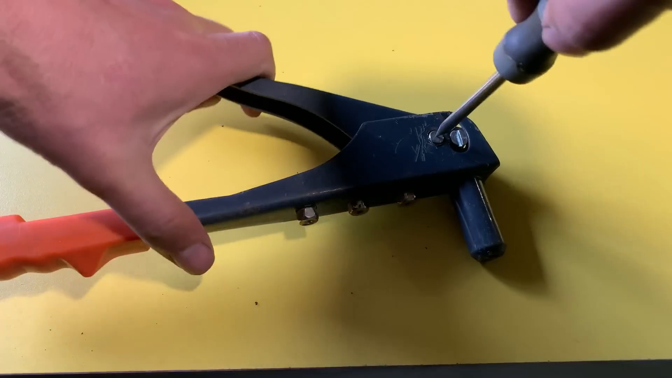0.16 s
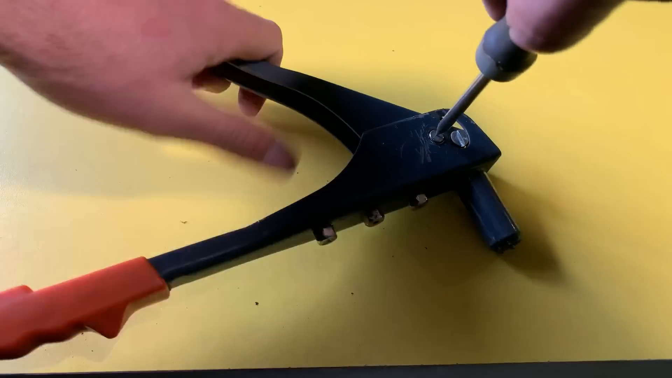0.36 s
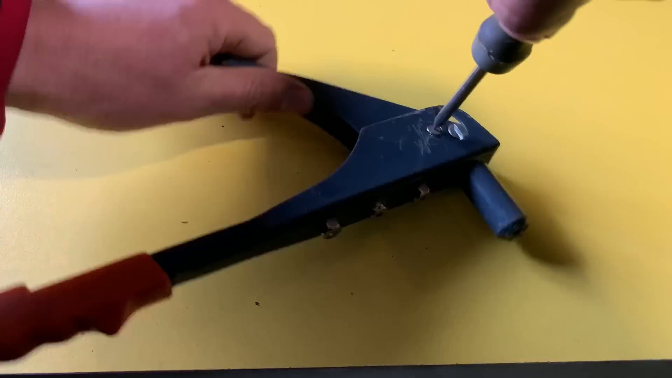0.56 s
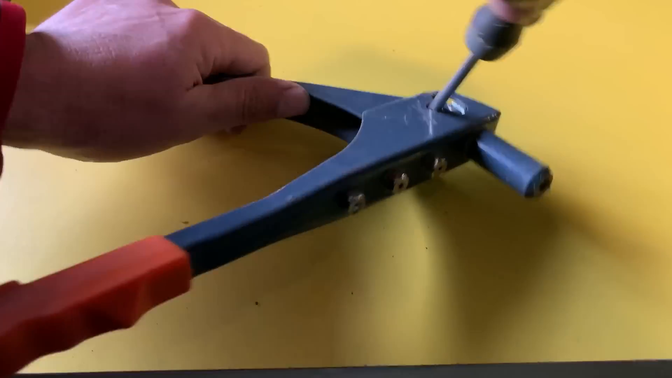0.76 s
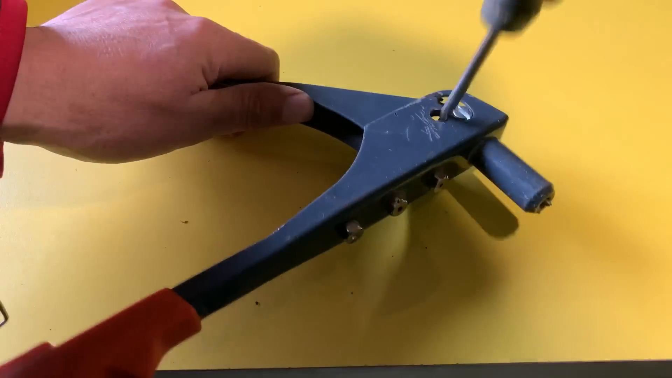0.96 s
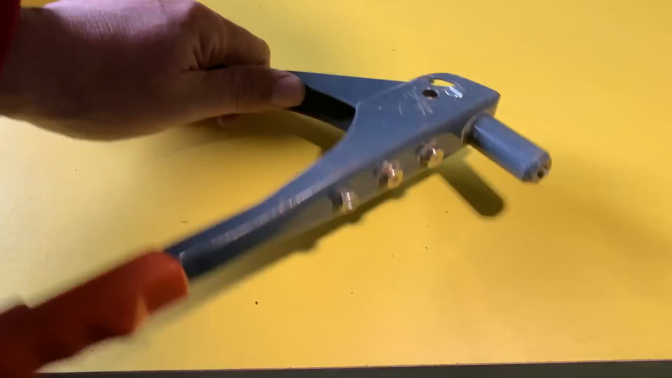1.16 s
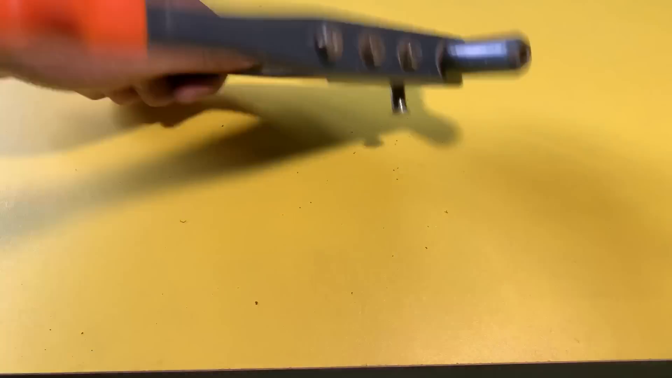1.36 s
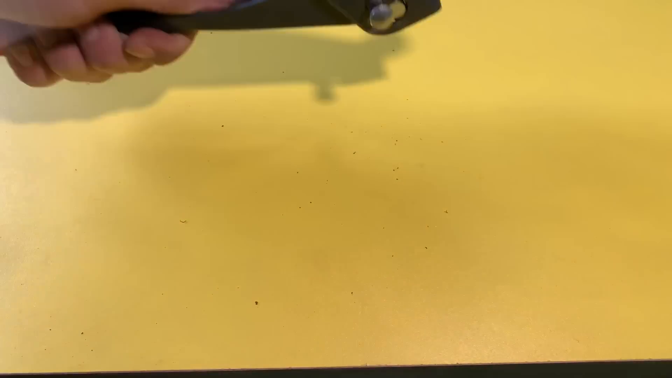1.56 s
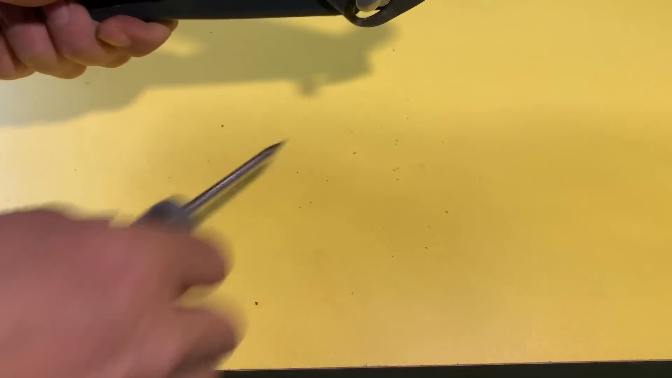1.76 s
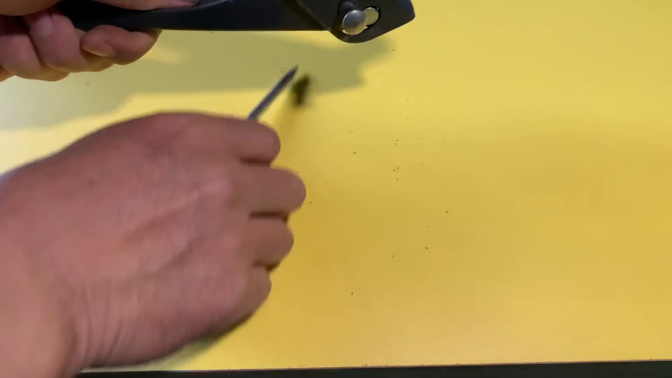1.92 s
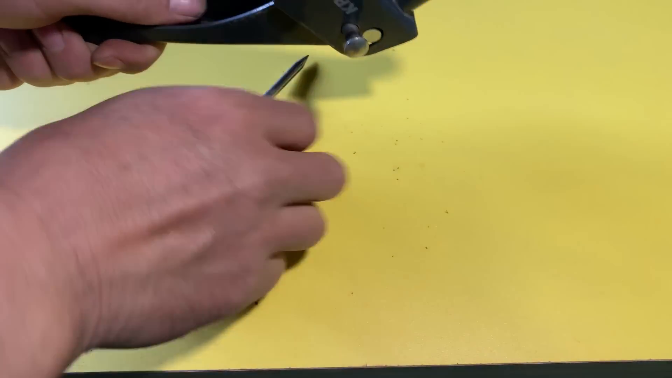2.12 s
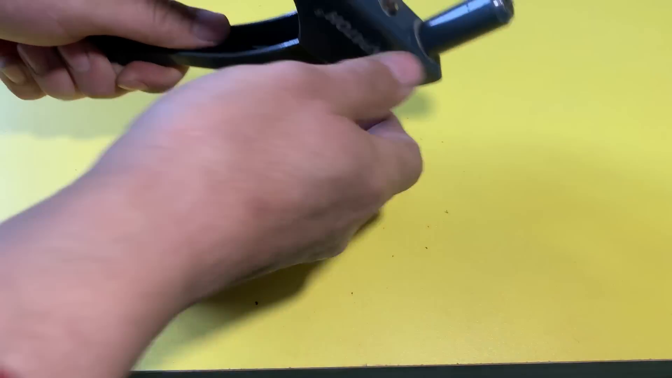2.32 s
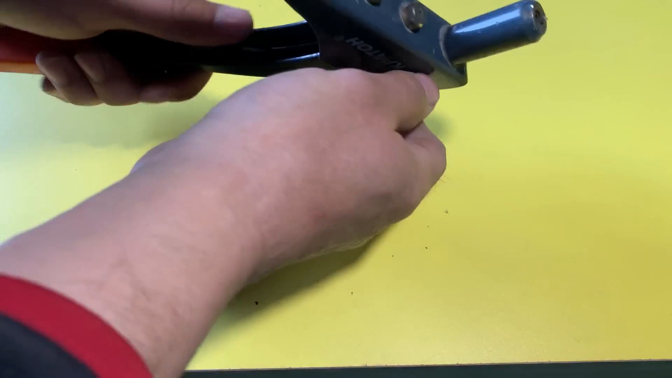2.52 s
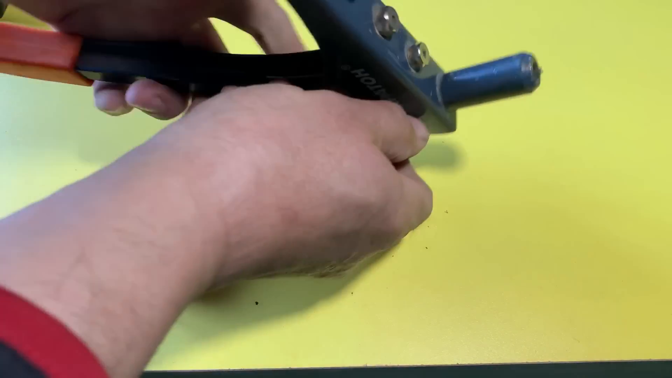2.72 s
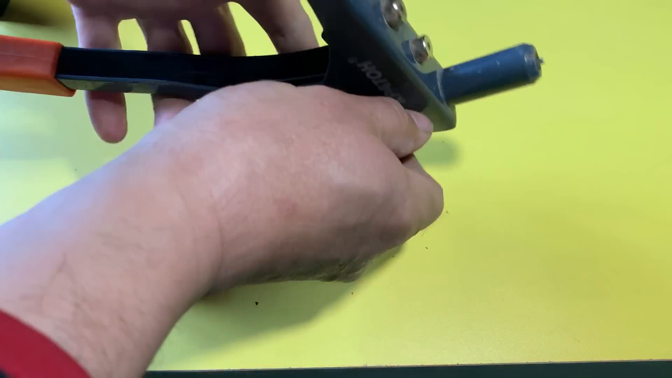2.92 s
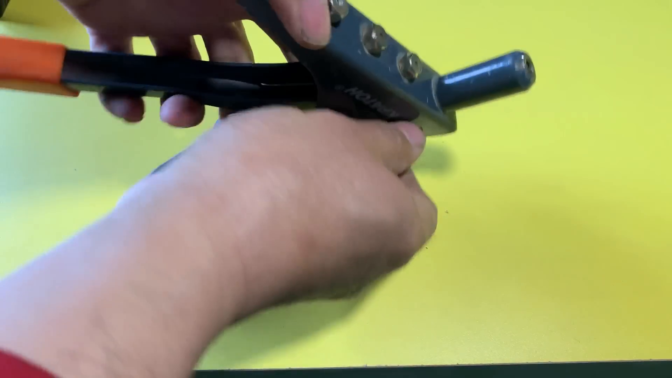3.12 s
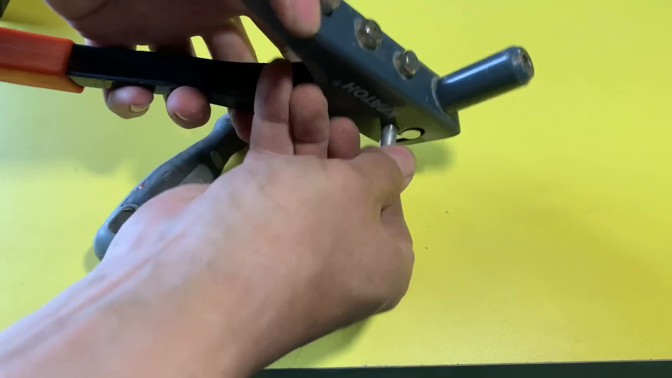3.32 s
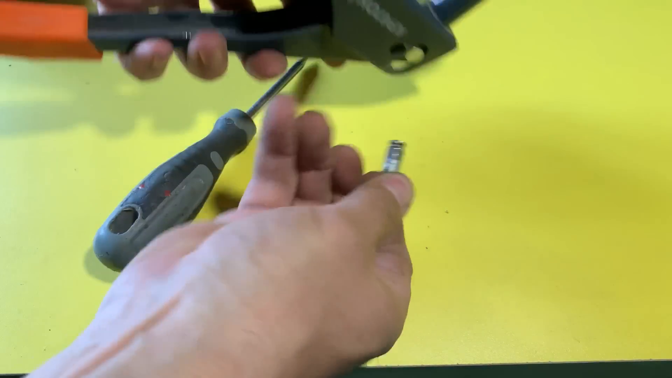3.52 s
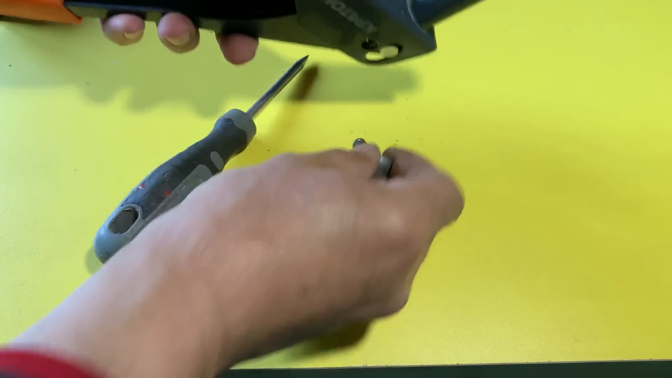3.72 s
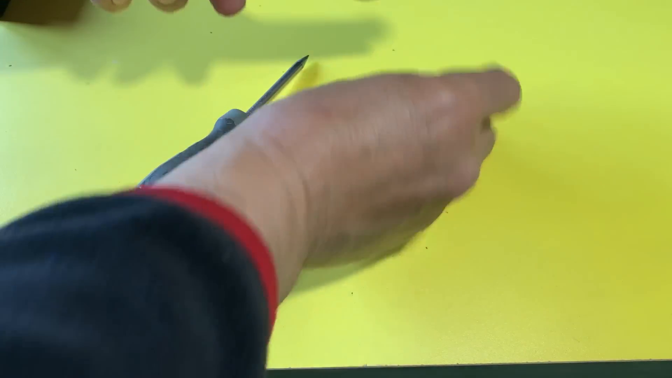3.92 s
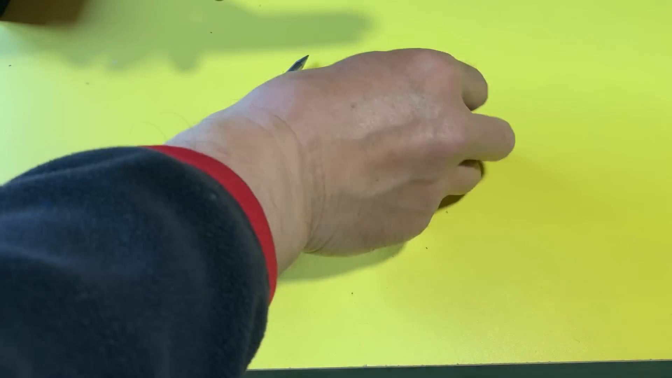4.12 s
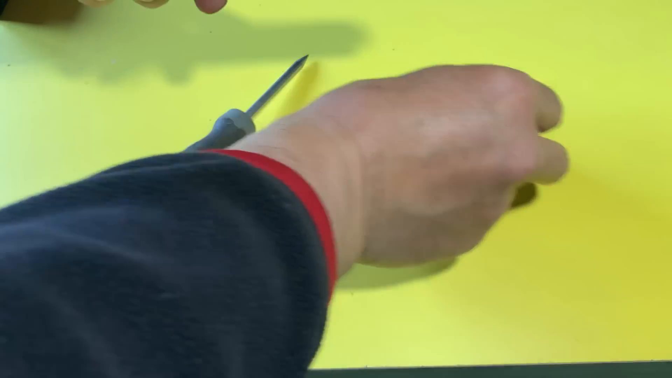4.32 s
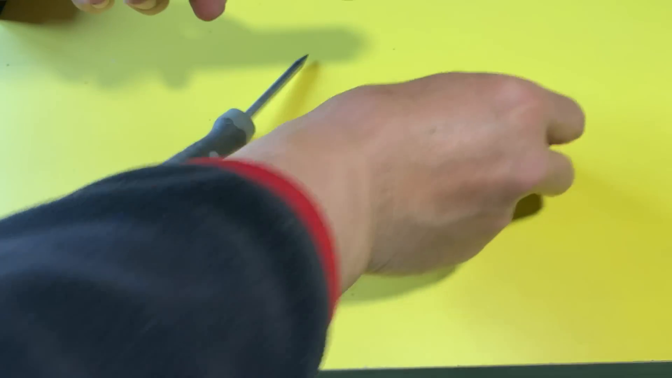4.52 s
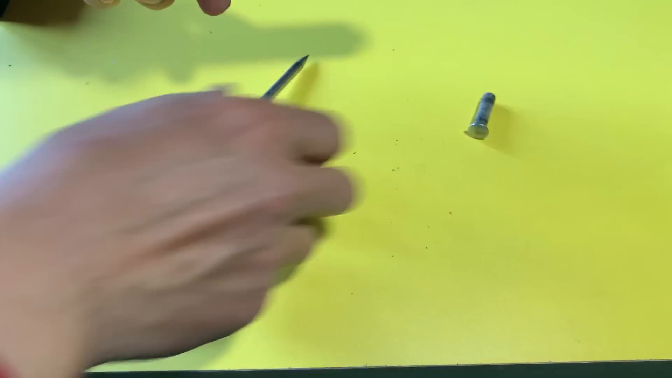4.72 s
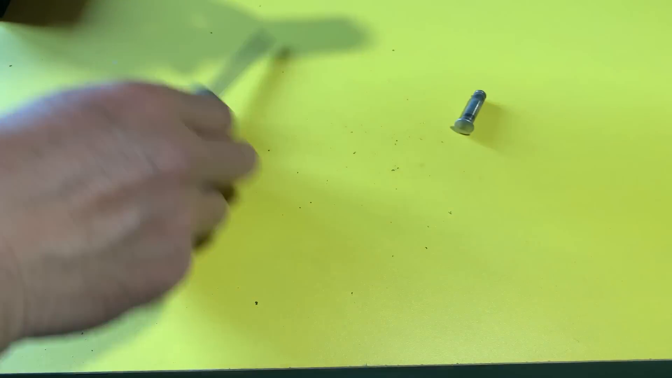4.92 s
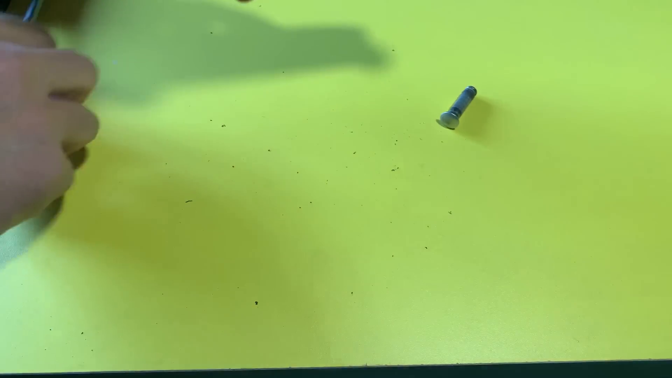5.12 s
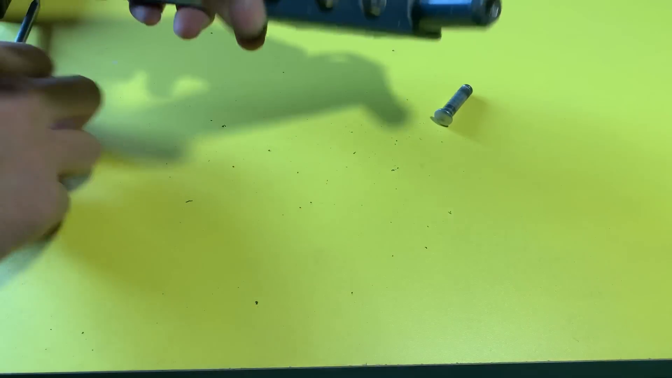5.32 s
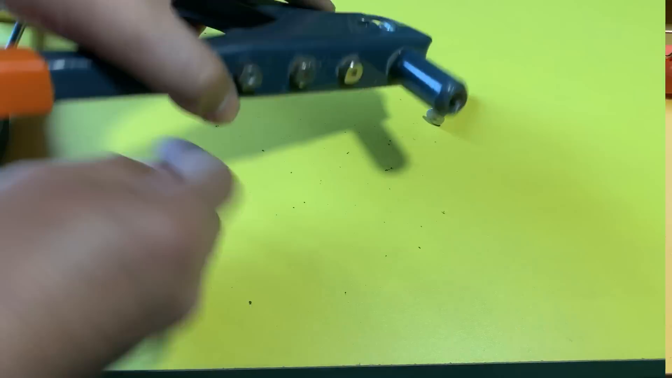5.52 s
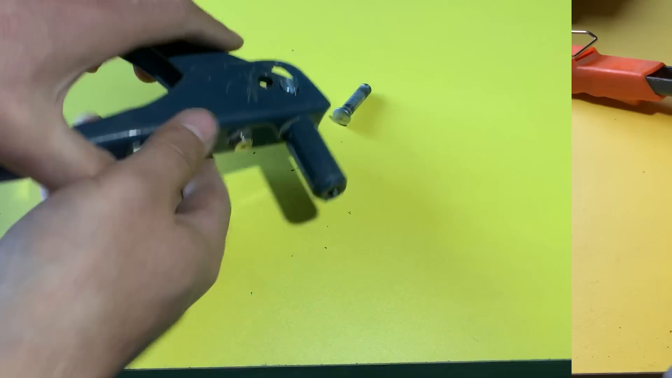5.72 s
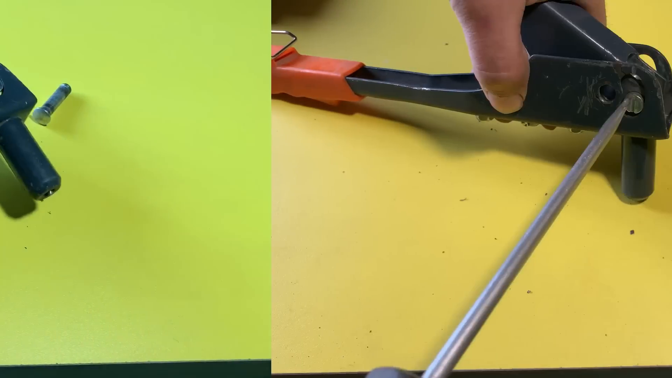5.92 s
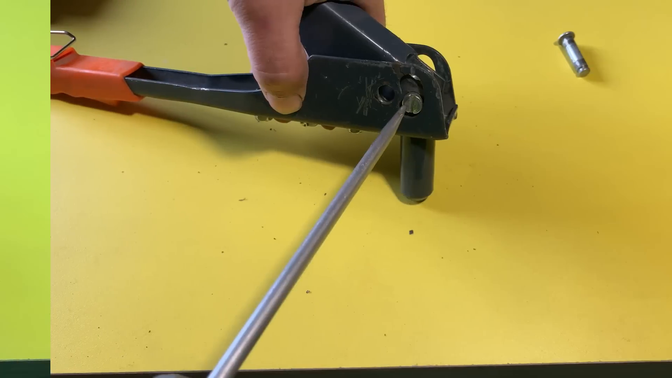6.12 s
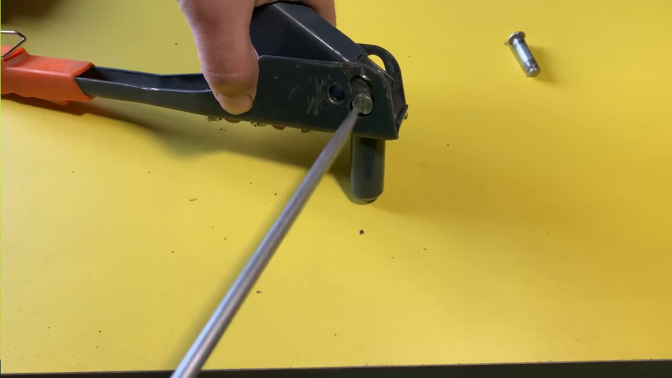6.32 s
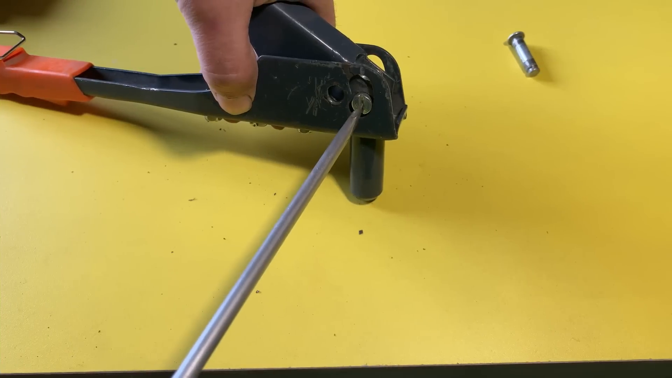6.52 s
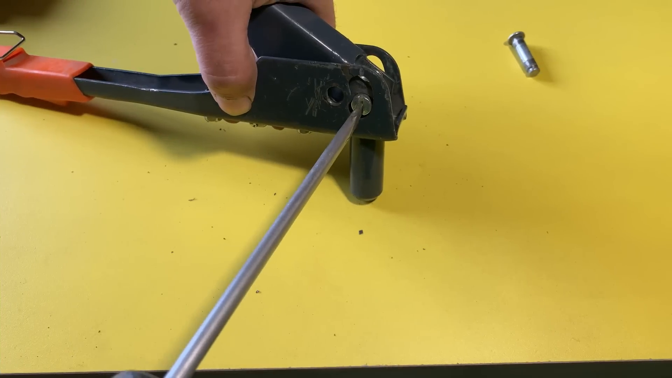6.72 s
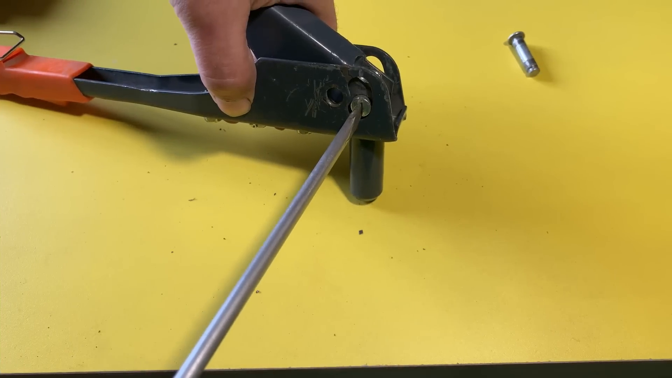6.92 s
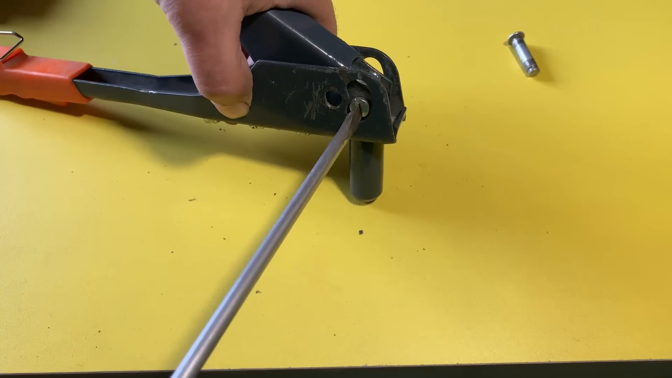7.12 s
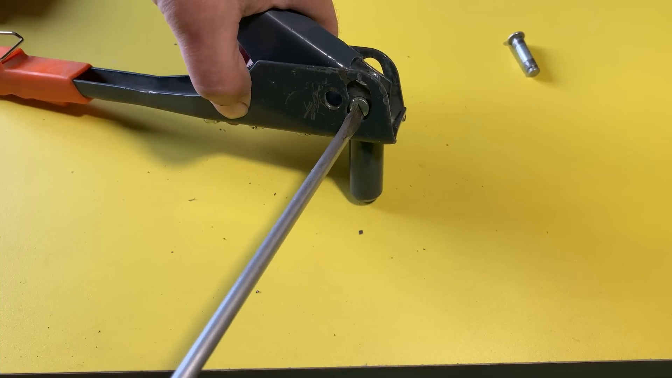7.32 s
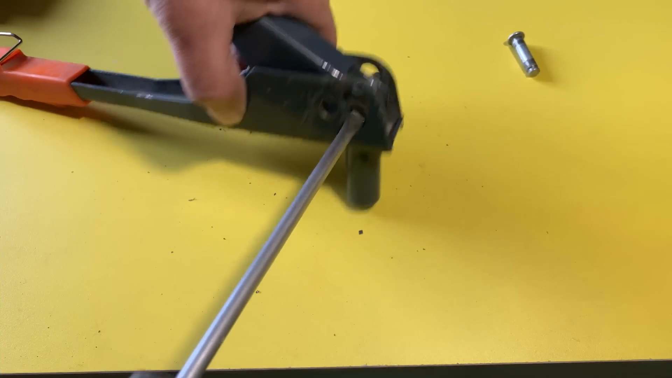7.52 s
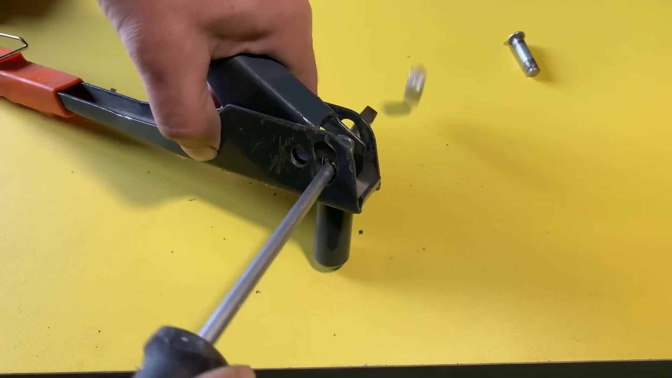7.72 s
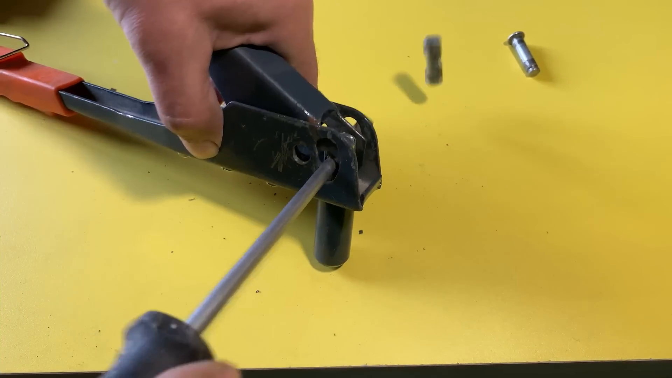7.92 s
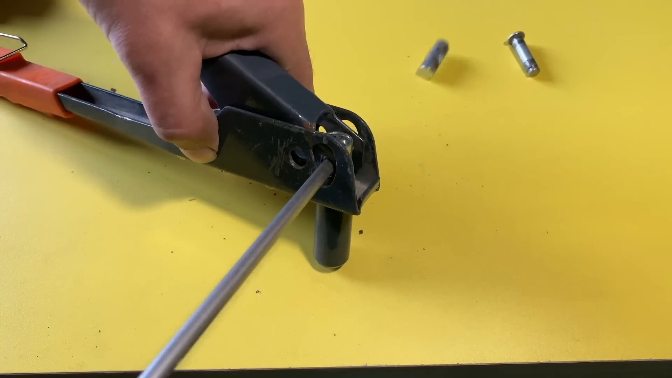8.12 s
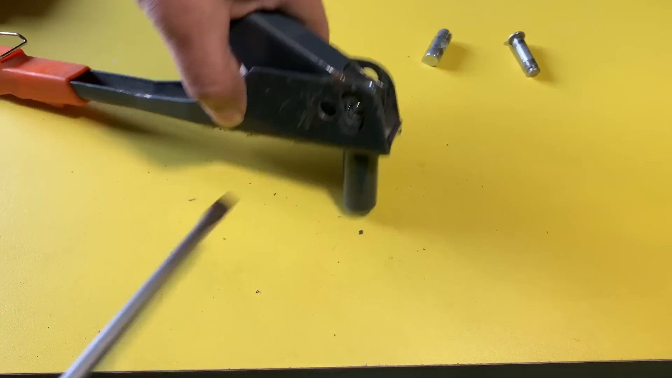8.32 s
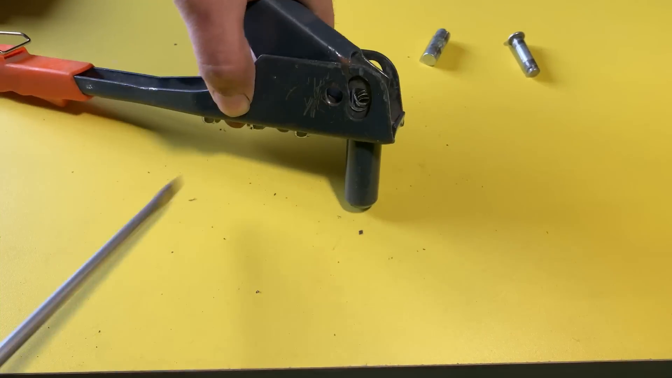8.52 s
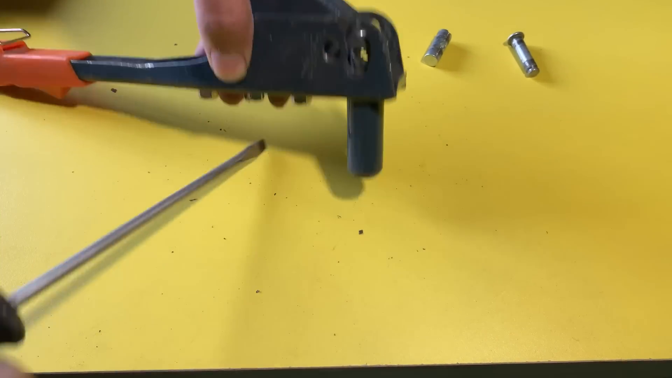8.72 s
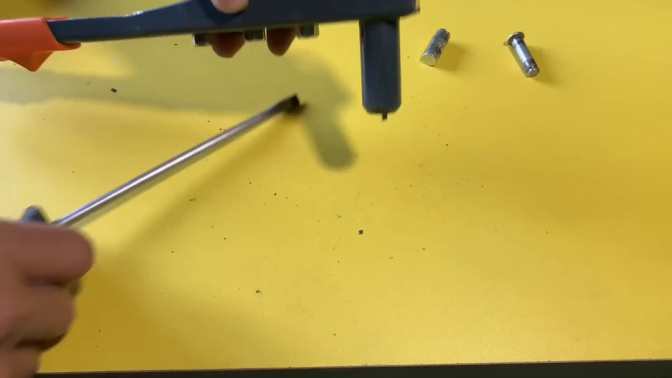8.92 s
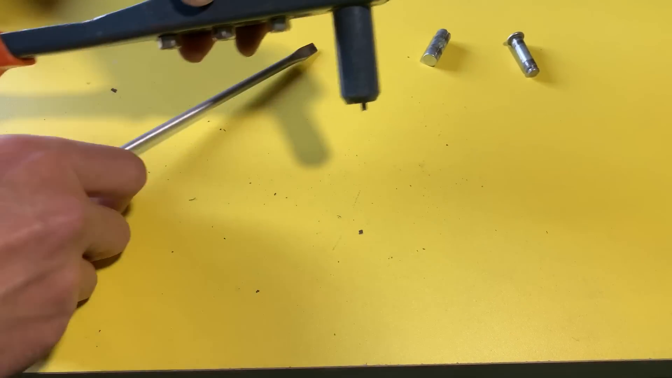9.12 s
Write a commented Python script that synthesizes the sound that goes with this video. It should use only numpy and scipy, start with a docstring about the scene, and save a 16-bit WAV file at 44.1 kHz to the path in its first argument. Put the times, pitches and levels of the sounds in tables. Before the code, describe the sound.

Close, dry steel sounds in a bare, ringing workshop. A loud clank and table thump come first, then a knock, faint clinks and soft rubbing. A pin scrapes out with a thin squeal and is set down; a hollow grip clatters. After quiet ticking, a second pin rattles out and bounces on the table, and a screwdriver drops and drags.

```python
"""Riveter on a workshop table

A hand riveter is taken apart in a bare, ringing workshop: the steel sounds close and dry, the table fills the room.
A screwdriver pushes out two steel pins; frame and lever clink and knock, the second pin drops and bounces,
and the screwdriver is laid down. Hard parts are decaying modes and noise cracks, struck once, in chatter or by
friction; the table is bending waves and booming modes; soft rubbing and air are coloured noise."""
import sys
import numpy as np
from scipy import signal
from scipy.fft import rfft, irfft, next_fast_len
from scipy.io import wavfile

SR = 44100
rng = np.random.default_rng(int(sys.argv[2]) if len(sys.argv) > 2 else 0)


def digitize_waveform(pressure):
    """Quantize a signal to 16-bit integers and store it at the path in sys.argv[1].

    Rows of a 2-D input are taken as channels; values are limited to [-1, 1].
    """
    field = np.atleast_2d(pressure).T
    bounded = np.clip(field, -1, 1)
    quanta = np.round(bounded * 32767).astype(np.int16)
    wavfile.write(sys.argv[1], SR, quanta)


N = 408366
HIT_T = np.arange(SR // 6) / SR  # time axis of a single touch, s


def from_db(db):
    """Amplitude ratio of a level in dB."""
    return 10 ** (np.asarray(db) / 20)


def unit_energy(x):
    """Sum of squares 1 in each channel."""
    return x / np.sqrt(np.sum(x ** 2, axis=-1, keepdims=True) + 1e-20)


def at_hz(points, hz):
    """Read a table on a log-frequency axis."""
    known_hz, values = np.transpose(points)
    return np.interp(np.log(np.maximum(hz, 1)), np.log(known_hz), values)


def dying(t, t60):
    """Exponential decay that falls 60 dB in t60 seconds."""
    return np.exp(-np.log(1000) * t / np.maximum(t60, 1e-5))


def add(track, s, sound):
    """Mix a sound in at time s."""
    start = max(round(s * SR), 0)
    track[:, start:start + sound.shape[-1]] += sound[..., :N - start]


def cut(x, hz, kind, order=2):
    """Low- or high-pass."""
    sos = signal.butter(order, min(hz, SR / 2 - 1), kind, fs=SR, output="sos")
    return signal.sosfilt(sos, x)


def through(x, response):
    """Pass a sound through an impulse response."""
    convolved = signal.fftconvolve(np.atleast_2d(x), np.atleast_2d(response), axes=-1)
    return convolved[:, :x.shape[-1]]


def coloured(x, spectrum, size=4096):
    """Causal, minimum-phase filter with the given spectrum."""
    gain = from_db(at_hz(spectrum, np.arange(size // 2 + 1) * SR / size))
    cepstrum = irfft(np.log(gain))
    cepstrum[1:size // 2] *= 2  # folding the cepstrum makes the phase minimal
    cepstrum[size // 2:] = 0
    return through(x, irfft(np.exp(rfft(cepstrum))))


# likeness of left and right in diffuse sound: pitch_hz, likeness (1 = same)
LIKENESS = [(60, 0.94), (130, 0.93), (290, 0.87), (640, 0), (1400, 0), (15000, 0)]


def diffuse(size):
    """White stereo noise, alike in the bass and unrelated in the treble."""
    mid, side = rfft(rng.standard_normal((2, size)))
    alike = np.clip(at_hz(LIKENESS, np.arange(len(mid)) * SR / size), -1, 1)
    shared = np.sqrt((1 + alike) / 2) * mid
    opposed = np.sqrt((1 - alike) / 2) * side * [[1], [-1]]
    return irfft(shared + opposed, size)


def hiss(spectrum):
    """Steady coloured stereo noise of rms 1."""
    noise = diffuse(next_fast_len(N))[:, :N]
    return unit_energy(coloured(noise, spectrum)) * np.sqrt(N)


def ringing(modes, crack_db, crack_t60, crack_hz, bright_db=0, left_lead_s=.000024):
    """One touch on a part: a crack, and modes whose strength and pitch shift a little with the grip."""
    hz, db, t60 = np.transpose(modes)[:, :, None]
    db = db + bright_db * np.log2(hz / hz.min())
    hz = hz * (1 + .005 * rng.standard_normal(hz.shape))
    sines = np.sin(2 * np.pi * hz * HIT_T) * dying(HIT_T, t60) * rng.choice([-1, 1], hz.shape)
    tone = from_db(db.T + 2 * rng.standard_normal((2, len(modes)))) @ sines
    tone = cut(tone, hz.min() / 2, "high")  # a small part radiates no bass
    crack = cut(rng.standard_normal(len(HIT_T)) * dying(HIT_T, crack_t60), crack_hz, "high")
    left, right = unit_energy(unit_energy(tone) + from_db(crack_db) * unit_energy(crack))
    late = np.exp(-2j * np.pi * np.fft.rfftfreq(len(HIT_T), 1 / SR) * left_lead_s)
    return np.array([left, irfft(rfft(right) * late, len(HIT_T))])


def friction(slides, grain_db=-1.5):
    """Rough surfaces catch at random; the force swells and fades over each stroke."""
    force = np.zeros((1, N))
    for start, end, db, per_s in slides:
        chance, (sizes, grain) = rng.random(SR), rng.standard_normal((2, SR))
        catches = (chance < per_s / SR) * sizes * from_db(grain_db * grain)
        catches = unit_energy(catches) * np.sqrt(SR)  # rms 1
        stroke = np.sin(np.pi * np.clip(np.arange(SR) / SR / max(end - start, 1e-3), 0, 1))
        add(force, start, from_db(db) * catches * stroke)
    return force


def part(hits, slides, modes, crack_db, crack_t60, crack_hz, chatter_per_s=5000, rebound=0.8):
    """A hard part is struck, chatters against its neighbour for a moment, or slides."""
    out = through(friction(slides), ringing(modes, crack_db, crack_t60, crack_hz))
    for s, db, chatter_s, bright_db in hits:
        touches = (rng.random(len(HIT_T)) < chatter_per_s / SR) * rng.standard_normal(len(HIT_T))
        force = rebound * touches * np.exp(-(HIT_T / max(chatter_s, 1e-4)) ** 2)
        force[0] = 1  # the first touch
        ring = ringing(modes, crack_db, crack_t60, crack_hz, bright_db)
        add(out, s, from_db(db) * unit_energy(through(ring, force)))
    return out


# colour of the steady air noise: pitch_hz, level_db (relative)
AIR = [(15, -28), (25, -1.5), (76, 7), (212, -5.5), (677, -21.5), (775, -18), (4490, -30.5), (7510, -37.5),
       (8590, -54), (10700, -41.5), (16000, -36.5)]


def air(rms_db=-69.5):
    """Steady, mostly low noise lies under everything."""
    return from_db(rms_db) * hiss(AIR)


# colour of the soft rubbing: pitch_hz, level_db (relative)
RUBBING_COLOUR = [(18, -22.5), (30, -1.5), (64, -0.5), (245, -14.5), (426, -11.5), (1250, -17.5),
                  (2010, -15), (4530, -20), (8520, -27.5), (11100, -33), (13300, -41.5), (14800, -30),
                  (16000, -43)]
# soft rubbing swells, the last one the hiss of the dragging screwdriver:
# loudest_s, rustle_db (before flutter), swelling_s, fading_s
RUBBING_SWELLS = [(.26, -58, 0.11, 0.048), (1.56, -54, 0.26, 0.8), (2.17, -55.5, 0.11, 0.3),
                  (2.98, -63.5, 0.4, 1), (3.88, -64, 0.24, 0.55), (4.72, -57, 0.15, 0.3),
                  (5.66, -68.5, 1, 0.31), (6.9, -79, 0.25, 0.43), (9.0, -49.5, 0.2, 0.13)]


def soft_rubbing(flutter_db=3.5, count=500):
    """Soft rubbing swells and fades a little unevenly; the last swell is the dragging screwdriver's hiss."""
    t = np.arange(N) / SR
    power = np.zeros(N)
    for s, db, rise_s, fall_s in RUBBING_SWELLS:
        swell = np.exp(-2 * ((t - s) / np.where(t < s, rise_s, fall_s)) ** 2)
        power += from_db(db) ** 2 * swell
    flutter = np.interp(t, np.linspace(0, N / SR, count), rng.standard_normal(count))
    return np.sqrt(power) * from_db(flutter_db * flutter) * hiss(RUBBING_COLOUR)


# decay of the workshop: pitch_hz, t60_s
ROOM_T60 = [(60, 1.4), (200, 1.1), (560, 0.78), (1500, 0.8), (4000, 0.91), (8000, .45), (15000, 0.52)]
# colour of its reverberation: pitch_hz, level_db (relative)
ROOM_COLOUR = [(60, -2), (200, 7), (600, 3.5), (1500, 6.5), (4000, 3), (8000, -2), (15000, -17.5)]


def workshop(x, build_s=0.0027):
    """Diffuse reverberation builds up at once, then dies at its own rate in each band."""
    t = np.arange(2 * SR) / SR
    noise, hz = rfft(diffuse(len(t))), np.arange(SR + 1) / 2
    tail = 0
    for k, (_, t60) in enumerate(ROOM_T60):
        share = at_hz([(row[0], j == k) for j, row in enumerate(ROOM_T60)], hz)  # overlapping bands
        tail = tail + irfft(noise * share) * unit_energy(dying(t, t60))
    build_up = 1 - np.exp(-(t / build_s) ** 2)
    return through(x, coloured(tail * build_up, ROOM_COLOUR))


# near walls, as they return table blows: delay_s, level_db, lowest_hz, highest_hz
BLOW_ECHOES = [(.0062, -5.5, 200, 2191), (.0330, -8, 100, 2800)]
# near walls, as they return light taps: delay_s, level_db, lowest_hz, highest_hz
TAP_ECHOES = [(.0059, 0.5, 722, 1683), (0.032, -10.5, 400, 3000)]


def near_walls(x, echoes, right_lead_s=.0003):
    """The board radiates widely: its middle range returns from the nearest walls, first on the right."""
    out = x.copy()
    for delay_s, db, low_hz, high_hz in echoes:
        echo = from_db(db) * cut(cut(x, high_hz, "low"), low_hz, "high")
        add(out, delay_s, echo * [[1], [0]])
        add(out, delay_s - right_lead_s, echo * [[0], [1]])
    return out


# lowest modes of the table: pitch_hz, level_db (relative), t60_s
TABLE_MODES = [(59.2, 0, 2.2), (72.8, -4.5, .5), (107.7, 2, 0.52), (113.4, -4, .8), (182.5, -7, 0.41),
               (180, -4, 1.4), (211, 3, 0.3), (239.6, -8, 0.38), (293, -2.5, 0.88), (336, -6, 0.7),
               (504, 5.5, 0.3)]
# jolts by the weight on the table: start_s, level_db (before the mode levels), most_excited_hz
JOLTS = [(.6130, -18.5, 85), (1.877, -39.5, 160), (3.442, -53, 91), (5.1682, -43, 195.5),
         (6.3292, -54, 203), (7.4859, -37.5, 180), (7.543, -41, 180), (8.285, -59, 380), (8.6988, -39, 165)]
# blows on the table top: start_s, drive_db (before filtering), contact_hardness_hz
KNOCKS = [(0.47, 10, 617), (.6, 22, 1200), (0.611, 8, 770), (0.6391, 23, 530), (0.6522, 21, 1500),
          (1.8748, 9, 1400), (1.884, 11, 1100), (1.909, 8.5, 1322), (3.157, -10, 1310), (3.4105, -9, 1500),
          (5.151, 12.5, 1200), (5.166, 21.5, 1250), (5.177, 11.5, 1270), (6.085, -20.5, 2515),
          (6.3345, -21, 2500), (6.502, -8.5, 1500), (7.09, -17, 1200), (7.4861, 4.5, 1500),
          (7.5143, 11, 1600), (7.544, 12.5, 1660)]
# every blow makes the table boom, less for each octave that the contact is harder than a soft one
BOOM_DB, BOOM_HZ, SOFT_HZ, BOOM_LOSS_DB_PER_OCTAVE = -55.5, 151, 714, 6


def table_thump(swell_s=0.0017, slope_db=9.0, spread=0.06, count=3):
    """Blows and jolts set the lowest modes booming, weaker by the octave off their pitch; close modes beat."""
    out, t = np.zeros((2, N)), np.arange(2 * SR) / SR
    hz, db, t60 = np.transpose(TABLE_MODES)[:, :, None]
    close = 0
    for _ in range(count):
        detuned_hz = hz * (1 + spread * rng.standard_normal(hz.shape))
        close = close + np.sin(2 * np.pi * detuned_hz * t) / count
    sines = close * dying(t, t60) * (1 - np.exp(-t / swell_s))
    blows = []
    for s, blow_db, hardness_hz in KNOCKS:
        loss_db = BOOM_LOSS_DB_PER_OCTAVE * np.log2(hardness_hz / SOFT_HZ)
        blows.append((s, blow_db + BOOM_DB - loss_db, BOOM_HZ))
    for s, thump_db, pitch_hz in blows + JOLTS:
        mode_db = thump_db + db - slope_db * np.abs(np.log2(hz / pitch_hz))
        add(out, s, from_db(mode_db).T @ sines)
    return cut(out, 33, "high")


# slide over the table top: start_s, end_s, drive_db (before filtering and slide_db), catches_per_s
TABLE_SLIDES = [(.22, .30, -53, 1500)]
# colour of the table top's dense higher modes: pitch_hz, level_db (relative)
BOARD = [(30, -32), (70, -8), (170, -10.5), (400, -6), (700, -7.5), (1100, -6), (1500, -8), (2500, -15.5),
         (3500, -15.5), (4800, -13.5), (8000, -11.5), (16000, -3)]


def table_top(flex_db=8.0, flex_t60=0.055, spread_s=0.0041, slide_db=11.5, slide_hz=4500):
    """A blow sends bending waves to and fro in the board; a soft contact leaves out the treble."""
    response = unit_energy(diffuse(len(HIT_T)) * dying(HIT_T, flex_t60))
    force = through(friction(TABLE_SLIDES), response)
    force = cut(force, slide_hz, "low") * from_db(slide_db)
    for s, db, hardness_hz in KNOCKS:
        waves = from_db(flex_db) * unit_energy(diffuse(len(HIT_T)) * dying(HIT_T, flex_t60))
        # the contact sounds alike on left and right
        contact = unit_energy(rng.standard_normal(len(HIT_T)) * np.exp(-HIT_T / spread_s))
        add(force, s, from_db(db) * cut(unit_energy(waves + contact), hardness_hz, "low"))
    return coloured(force, BOARD)


# light parts tap the table top; the freed pin bounces end over end, lands flat and rocks:
# start_s, energy_db, contact_hardness_hz, stressed_pitch_hz
TAPS = [(.4675, -8, 674, 700), (3.9651, -15, 2850, 1800), (3.9725, -1.5, 2500, 1380),
        (4.105, -14, 2000, 1600), (4.3274, -12.5, 3300, 1330), (7.7009, 8.5, 2780, 1310),
        (7.8708, 6, 1990, 1310), (8.0059, 2.5, 2500, 1050), (8.026, 2, 3200, 2200),
        (8.1142, -7.5, 3600, 2200), (8.1176, 3.5, 3800, 2270), (8.2016, 0.5, 3800, 1960),
        (8.2422, -1, 3540, 1810), (8.2726, -8, 3300, 1900), (8.289, -9.5, 413, 403), (8.296, -9, 430, 447),
        (8.313, -18.5, 407, 372), (8.6977, -13.5, 1900, 856), (8.7276, -10, 1860, 1500),
        (8.7516, -12, 1900, 1500)]
# colour of what a light part stirs in the board: pitch_hz, level_db (relative)
LIGHT_BOARD = [(100, -6), (300, -8.5), (650, -5), (950, -2.5), (1500, -6), (2500, -0.5), (3500, -4.5),
               (5000, -5.5), (16000, -8)]


def table_taps(travel_s=.0007, flex_db=3.0, flex_t60=0.06, right_lead_s=.00008, stress_db=2.0, sharpness=0.9):
    """A light part sends one bending wave, treble first, then a shiver; each tap stresses its own pitch."""
    out, hz = np.zeros((2, N)), np.fft.rfftfreq(len(HIT_T), 1 / SR)
    cycles = 2 * travel_s * np.sqrt(hz * 1000)  # travel_s is the delay at 1 kHz
    phase = cycles + hz * [[right_lead_s], [0]]
    wave = unit_energy(irfft(np.exp(-2j * np.pi * phase), len(HIT_T)))
    for s, db, hardness_hz, pitch_hz in TAPS:
        shiver = from_db(flex_db) * unit_energy(diffuse(len(HIT_T)) * dying(HIT_T, flex_t60))
        tap = cut(coloured(wave + shiver, LIGHT_BOARD), hardness_hz, "low")
        stressed = signal.lfilter(*signal.iirpeak(pitch_hz, sharpness, fs=SR), tap)
        tap = tap + from_db(stress_db) * stressed
        add(out, s, from_db(db) * unit_energy(tap))
    return out


# the screwdriver falls: first_touch_s, first_flight_s
DRIVER_FALL = (8.6973, .0303)


def driver_drop(db, loss_db, chatter_s, count=4, restitution=.798):
    """Hits on one part of the falling screwdriver; each flight lasts the restitution share of the last."""
    first_s, flight_s = DRIVER_FALL
    touches_s = first_s + flight_s * (1 - restitution ** np.arange(count)) / (1 - restitution)
    return [(s, db - k * loss_db, chatter_s, 0) for k, s in enumerate(touches_s)]


# modes of the screwdriver handle: pitch_hz, level_db (relative), t60_s
HANDLE = [(772, -7.5, 0.066), (1000, -3.5, 0.014), (1452, -7, 0.065), (1600, 4, 0.019), (1780, -3.5, 0.07),
          (2250, -4.5, 0.023), (3230, -6, 0.01), (4630, -3, .003), (4880, -7.5, 0.011)]
# hits on its hollow grip: start_s, energy_db, chatter_s, brightness_db_per_octave
GRIP_HITS = [(5.1485, -6, 0.0032, 0.29), (5.166, -5.5, .0034, -.5), (5.178, -5, 0.0034, -.5),
             (5.2045, -9, 0.00066, 0)]
# the grip skids: start_s, end_s, rms_db (at full stroke), catches_per_s
GRIP_SLIDES = [(5.128, 5.161, -50, 2510)]
# modes of the grip: pitch_hz, level_db (relative), t60_s
GRIP = [(1087, -7, 0.045), (1340, -2, 0.016), (1600, 1, 0.0058), (2015, 0.5, 0.0095), (2330, -3.5, .008),
        (3300, -9, 0.0081), (3780, -6, 0.0063)]
# the screwdriver drags over the table: start_s, end_s, rms_db (at full stroke), catches_per_s
HANDLE_SLIDES = [(6.77, 6.835, -76.5, 1200), (7.061, 7.28, -80.5, 716), (8.821, 8.94, -43, 500),
                 (8.94, 9.097, -44, 600)]
# modes of the dragged screwdriver: pitch_hz, level_db (relative), t60_s
DRAG = [(806, 9.5, 0.0022), (1450, -3.5, 0.056), (1660, -10, 0.036), (2100, 6, 0.0033),
        (4170, -15.5, 0.019)]


def screwdriver_handle():
    """The handle bounces to rest, its hollow grip skids and clatters as it is put aside, and it drags."""
    drop = driver_drop(db=1, loss_db=4, chatter_s=0.00049)
    out = part(drop, [], HANDLE, crack_db=-10.0, crack_t60=0.0066, crack_hz=199.3)
    out += part(GRIP_HITS, GRIP_SLIDES, GRIP, crack_db=-26.5, crack_t60=0.0032, crack_hz=600)
    out += part([], HANDLE_SLIDES, DRAG, crack_db=-7.5, crack_t60=0.013, crack_hz=300)
    return out


# hits on the screwdriver shaft: start_s, energy_db, chatter_s, brightness_db_per_octave
SHAFT_HITS = [(.4668, 2.5, .0024, 0), (1.0426, -25.5, .00039, 0), (3.157, -21, .0013, 0)]
# slides of the shaft: start_s, end_s, rms_db (at full stroke), catches_per_s
SHAFT_SLIDES = [(0.152, .304, -62.5, 1200), (0.455, .474, -46, 2700), (8.384, 8.763, -55.5, 9400)]
# modes of the shaft, damped by the hand: pitch_hz, level_db (relative), t60_s
SHAFT = [(2140, -9.5, 0.016), (3340, -1, 0.034), (5150, -15, .004), (6650, -12, .005), (7106, -10, .005),
         (9700, -5, .005), (10400, -1, 0.0074), (14800, 4, .004)]


def screwdriver_shaft():
    """The steel shaft touches and slides, then lands together with the handle."""
    hits = SHAFT_HITS + driver_drop(db=-12, loss_db=22, chatter_s=0.00067)
    return part(hits, SHAFT_SLIDES, SHAFT, crack_db=-1.5, crack_t60=.004, crack_hz=6000)


# light ticks of the loose spring: start_s, energy_db
TICKS = [(0.573, -22), (1.116, -38), (4.087, -25.5), (4.6703, -26), (4.798, -21), (4.884, -28),
         (4.894, -22.5), (4.9494, -23.5), (5.017, -36), (5.041, -22), (5.31, -32), (5.336, -26.5),
         (5.779, -33.5), (5.9, -29), (5.9061, -34), (6.403, -44), (6.5693, -37), (6.9978, -34.5)]
# fine slides: start_s, end_s, rms_db (at full stroke), catches_per_s
FINE_SLIDES = [(0.159, 0.265, -49, 2880), (1.491, 1.622, -59.5, 3020), (2.573, 2.72, -65.5, 2940),
               (3.101, 3.168, -43, 1200), (3.638, 3.76, -50.5, 404), (5.791, 5.816, -49.5, 900),
               (5.823, 5.864, -51, 1500), (8.984, 9.08, -53.5, 3000)]
# modes of the spring: pitch_hz, level_db (relative), t60_s
SPRING = [(7570, 3.5, 0.0036), (10040, 6.5, 0.0043), (11260, -2.5, .02), (12300, -11, 0.0095),
          (12900, -1.5, 0.014)]


def spring(chatter_s=0.0027, rebound_s=0.0086, rebound_db=-9.5):
    """The loose spring touches and rebounds once, more weakly; fine slides excite it too."""
    hits = []
    for s, db in TICKS:
        hits.append((s, db, chatter_s, 0))
        hits.append((s + rebound_s, db + rebound_db, chatter_s, 0))
    return part(hits, FINE_SLIDES, SPRING, crack_db=-6.5, crack_t60=.010, crack_hz=6100)


# the hinge rubs as the tool is lifted: start_s, end_s, rms_db (at full stroke), catches_per_s
HINGE_SLIDES = [(0.912, 0.981, -35, 2900)]
# modes of the rubbing hinge: pitch_hz, level_db (relative), t60_s
HINGE = [(2290, 12.5, 0.0074), (2600, -3, 0.0099), (5444, 9, 0.011), (7360, -1, .0026), (11100, 6, 0.003),
         (14200, -1, .0079)]


def rubbing_hinge():
    """Friction makes the hinge's modes ring."""
    return part([], HINGE_SLIDES, HINGE, crack_db=-1, crack_t60=0.0013, crack_hz=1500)


# taps at the tip of the riveter: start_s, energy_db
TIP_HITS = [(3.077, -24), (5.1478, -6.5), (5.7294, -38.5), (5.7785, -38.5), (6.0856, -34.5), (6.3295, -18),
            (6.341, -26), (6.5014, -35), (6.7761, -57), (6.9182, -45), (7.2014, -57)]
# the tip rattles faintly as it is positioned: start_s, end_s, rms_db (at full stroke), catches_per_s
TIP_SLIDES = [(5.735, 5.94, -68.5, 330), (6.301, 6.327, -59, 840), (6.798, 6.96, -82, 700),
              (7.468, 7.5, -54.5, 2800)]
# modes of the side plates around the pin holes: pitch_hz, level_db (relative), t60_s
TIP = [(827, -5, 0.012), (1100, -10, 0.01055), (1618, -10.5, .014), (3400, -4.5, .013), (3800, -3, 0.0083),
       (4286, -2.5, 0.0084), (4760, -2, 0.0066), (6210, -8, .009), (7240, -5, 0.011), (10480, -6, 0.0042),
       (14430, -11, .005)]


def riveter_tip(chatter_s=0.0091):
    """The side plates ring as the tip is tapped and positioned."""
    hits = [(s, db, chatter_s, 0) for s, db in TIP_HITS]
    return part(hits, TIP_SLIDES, TIP, crack_db=-3.5, crack_t60=.006, crack_hz=1500)


# steel hits the frame: start_s, energy_db, chatter_s, brightness_db_per_octave
FRAME_HITS = [(.5988, 4.5, .0056, 4), (.6120, 7.5, .0091, -2), (.6175, -0.5, .005, 0), (.6530, 8, .002, -5)]
# slide of the frame: start_s, end_s, rms_db (at full stroke), catches_per_s
FRAME_SLIDES = [(0.601, 0.631, -20.5, 3060)]
# modes of the frame, damped by the hand: pitch_hz, level_db (relative), t60_s
FRAME = [(930, -9, 0.012), (1900, -8.5, .008), (2156, 0.5, 0.033), (2110, -4, 0.02), (3270, -8.5, 0.014),
         (4430, -11.5, .004), (6430, -5.5, 0.0057), (9200, 2.5, .004), (11100, -1.5, 0.0046),
         (14600, -3, .004)]


def riveter_frame():
    """The frame clinks, its modes damped by the hand."""
    return part(FRAME_HITS, FRAME_SLIDES, FRAME, crack_db=-8.5, crack_t60=.012, crack_hz=900)


# steel hits the lever: start_s, energy_db, chatter_s, brightness_db_per_octave
LEVER_HITS = [(2.4255, -21.5, 0.0019, -1.5), (2.4684, -17, 0.0027, 1.5), (3.079, -23.5, 0.0031, -5.5),
              (3.1165, -22, 0.0036, -4.5), (3.1545, -15.5, .0034, -8), (3.163, -12, 0.0036, -2),
              (3.2210, 4, 0.00024, 3), (3.4100, 5.5, 0.00039, 3.5), (3.4125, 3, 0.0016, 2.5)]
# slides of the lever: start_s, end_s, rms_db (at full stroke), catches_per_s
LEVER_SLIDES = [(3.134, 3.238, -43, 1200), (3.4, 3.42, -33.5, 4000)]
# modes of the lever, damped by the hand: pitch_hz, level_db (relative), t60_s
LEVER = [(800, -26, 0.034), (1100, -24.5, .006), (1650, -14, .0057), (1982, -2, 0.034), (2087, -5, .015),
         (3370, -7, 0.021), (3630, -10, 0.038), (4920, -8, .007), (5750, -16, .006), (6640, -2, .007),
         (7470, 1, 0.02), (9930, 8, 0.018), (10600, 6.5, .006), (11700, 0, .008), (14750, 3, .005)]


def riveter_lever():
    """The lever clinks and scrapes, its modes damped by the hand."""
    return part(LEVER_HITS, LEVER_SLIDES, LEVER, crack_db=-18.0, crack_t60=0.018, crack_hz=1200)


# the tight pin squeals as it is drawn from its bore: start_s, pitch_hz, level_db
SQUEAL = [(3.087, 11960, -69), (3.121, 11860, -50.5), (3.158, 11400, -46.5), (3.21, 10400, -52.5),
          (3.225, 10400, -55.5)]


def squeal(waver=0.06):
    """Steel sticks and slips: one unsteady high note that sinks as the pin comes out."""
    t, (s, hz, db) = np.arange(N) / SR, np.transpose(SQUEAL)
    pitch_hz = np.interp(t, s, hz) * (1 + waver * rng.standard_normal(N))
    phase = 2 * np.pi * np.cumsum(pitch_hz) / SR
    return np.interp(t, s, from_db(db), left=0, right=0) * np.sin(phase)


# steel hits the pins: start_s, energy_db, chatter_s, brightness_db_per_octave
PIN_HITS = [(2.0648, -19.5, 0.0032, -5), (2.1327, -27, .0009, -1.5), (2.8695, -21, 0.00081, 1),
            (3.9732, -10.5, 0.00025, 3), (7.7008, -3, .0002, 9.5), (7.8706, -4.5, 0.00015, -9),
            (8.0062, -11, .0002, 18), (8.026, -3, 0.00036, -2.5), (8.1142, -3.5, .0008, 6),
            (8.1175, -1, 0.0014, -2), (8.1962, 0, .006, 4), (8.2002, 1.5, 0.0052, -2),
            (8.229, -21, .001, 0), (8.2428, -11.5, .0005, 0), (8.2468, -19, .001, -6),
            (8.2745, -6.5, 0.003, -21)]
# the pin rolls between its last bounces: start_s, end_s, rms_db (at full stroke), catches_per_s
PIN_SLIDES = [(8.122, 8.193, -46, 400), (8.205, 8.321, -46, 600)]
# modes of a pin: pitch_hz, level_db (relative), t60_s
PIN = [(1730, -3, .012), (2220, -3, .012), (2580, 4, .008), (3750, -1.5, .009), (4300, -2, .007),
       (4650, -1, .005), (5420, -1, 0.0029), (6570, 0.5, .006), (7300, -5.5, .004), (9950, -1, .004),
       (11000, -2.5, .004), (11200, 0, .004), (14900, 1, .004)]
# the second pin rattles through its bore: start_s, energy_db, chatter_s, brightness_db_per_octave
BORE_HITS = [(7.4862, -0.5, 0.01, 0), (7.5125, 0, 0.0038, -0.83), (7.5195, 4, 0.0042, -.5),
             (7.5392, 1.5, 0.0099, 2.1), (7.5455, 0, 0.0024, 3.6), (7.629, -27, .001, 2)]
# modes heard from the bore: pitch_hz, level_db (relative), t60_s
BORE = [(2500, -9, 0.0041), (3490, 1.5, 0.0065), (3800, -5, 0.03), (5060, 0, 0.011), (5810, -6, 0.013),
        (7370, -1.5, 0.0084), (7500, 11.5, 0.0069), (10200, 17.5, 0.003), (10400, 3, 0.0057),
        (11470, 7.5, 0.01), (11700, -3, 0.0037), (15100, 10.5, 0.0071)]


def pivot_pins():
    """The pins clink; the second rattles through its bore, then drops, bounces and rolls."""
    out = part(PIN_HITS, PIN_SLIDES, PIN, crack_db=-1, crack_t60=0.0031, crack_hz=2238)
    out += part(BORE_HITS, [], BORE, crack_db=-6, crack_t60=0.0053, crack_hz=2420)
    return out


def scene():
    """The small steel parts sound close and dry; the table fills the room."""
    boom, board, taps = table_thump(), table_top(), table_taps()
    handle, hinge, tip = screwdriver_handle(), rubbing_hinge(), riveter_tip()
    small = screwdriver_shaft() + spring()
    frame, lever, pins = riveter_frame(), riveter_lever() + squeal(), pivot_pins()
    steel = frame + hinge + small + pins + lever + tip

    # each body sends its own share of sound into the room
    send = from_db(-7.0) * cut(frame, 3000, "high", order=4)
    send += from_db(-7.0) * cut(lever, 2300, "high", order=4)
    send += from_db(-12) * hinge + from_db(-9.0) * small
    send += from_db(-3.5) * pins + from_db(-6.0) * tip
    send += from_db(-2.0) * board + from_db(-4.0) * taps
    send += from_db(-1.0) * handle + from_db(-5.5) * boom

    background = air() + soft_rubbing() + workshop(send)
    table = boom + near_walls(board, BLOW_ECHOES) + from_db(-1.5) * near_walls(taps, TAP_ECHOES)
    return background + table + handle + steel


# colour of the treble, narrow dips and a broad lift: pitch_hz, width_hz, gain_db
TREBLE_COLOUR = [(8560, 710, -16), (13400, 580, -21.5), (14300, 2600, 3.5), (16200, 460, -13.5)]


def record(dry):
    """Colour of the treble: narrow dips, a broad lift, and a cut at 16 kHz."""
    for hz, width_hz, gain_db in TREBLE_COLOUR:
        band = signal.lfilter(*signal.iirpeak(hz, hz / (2 * width_hz), fs=SR), dry)
        dry = dry + (from_db(gain_db) - 1) * band
    return signal.sosfilt(signal.ellip(10, .1, 80, 16000, fs=SR, output="sos"), dry)


dry = scene()
out = record(dry)
digitize_waveform(out)
```